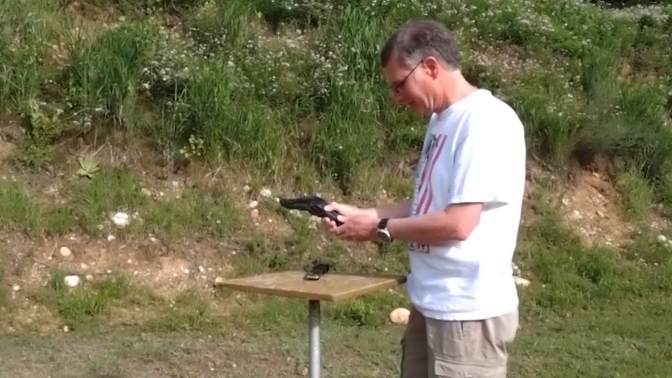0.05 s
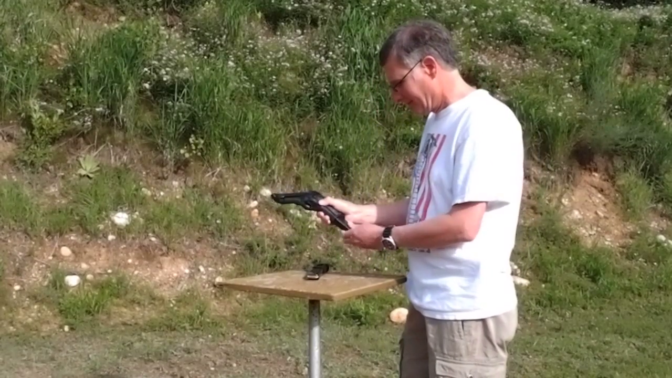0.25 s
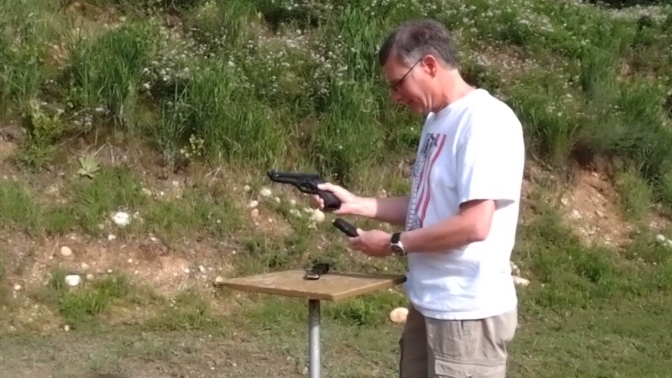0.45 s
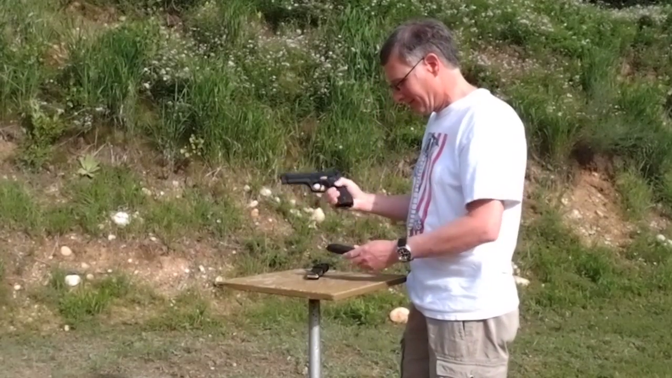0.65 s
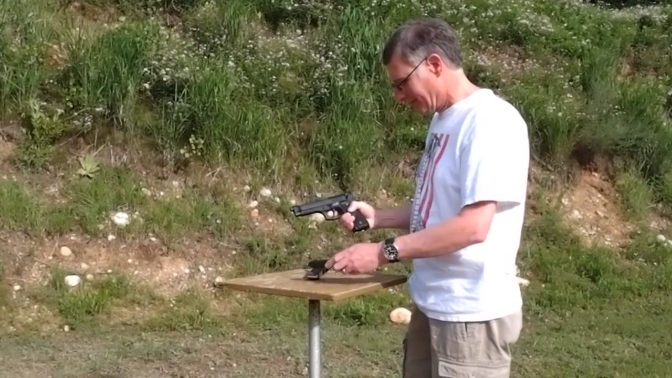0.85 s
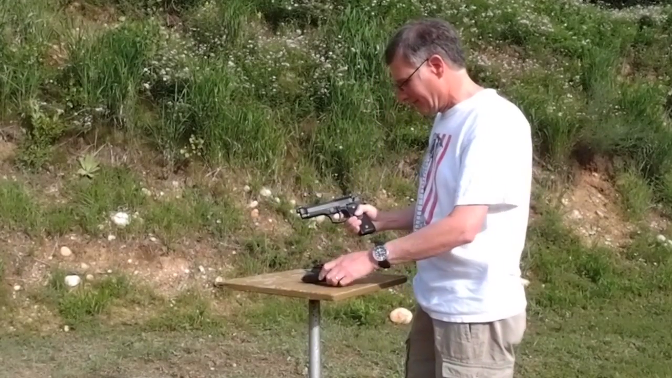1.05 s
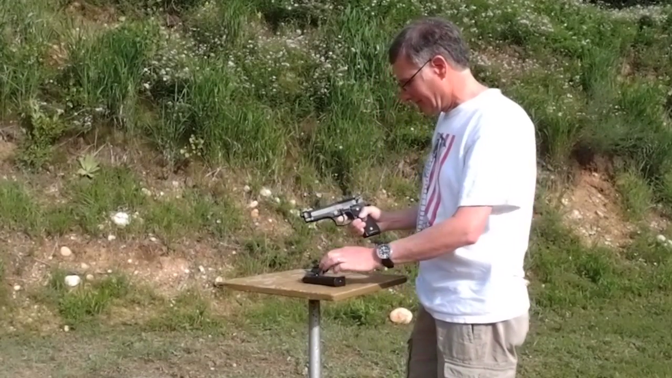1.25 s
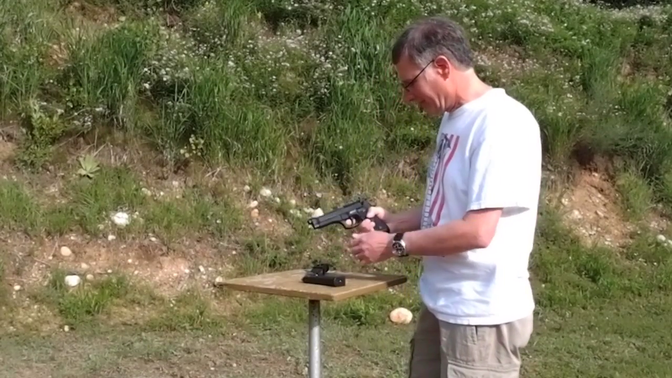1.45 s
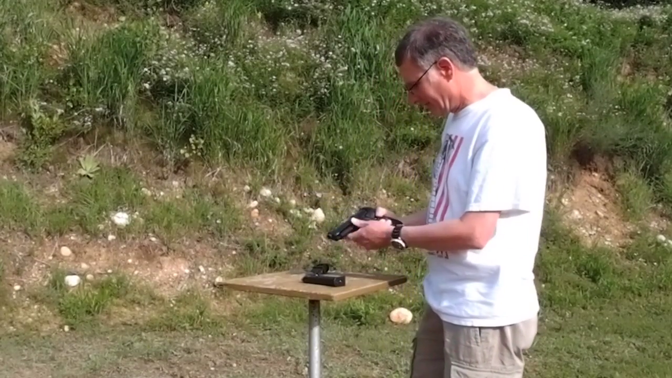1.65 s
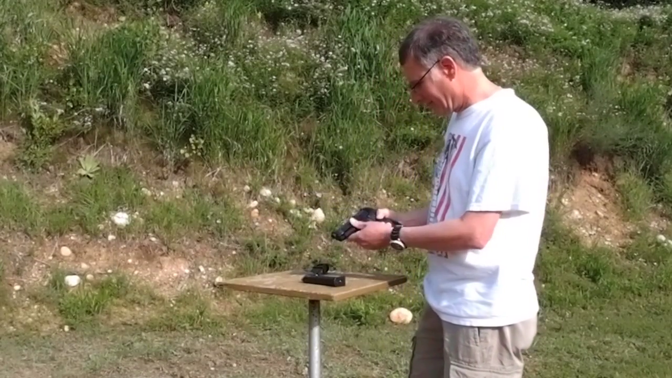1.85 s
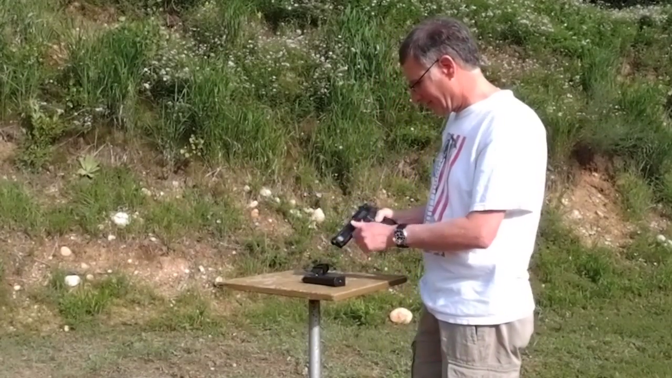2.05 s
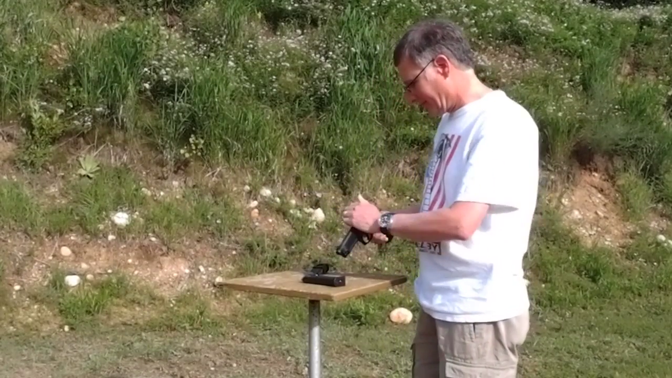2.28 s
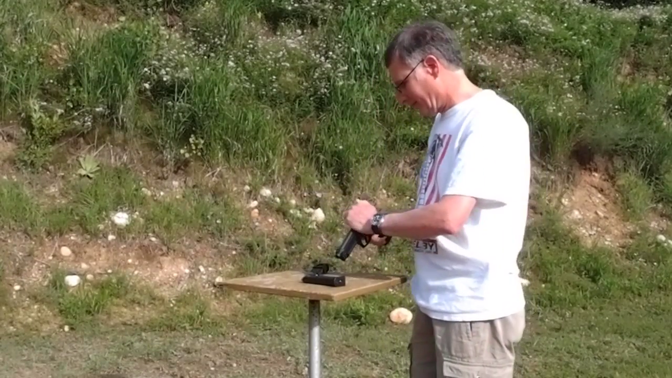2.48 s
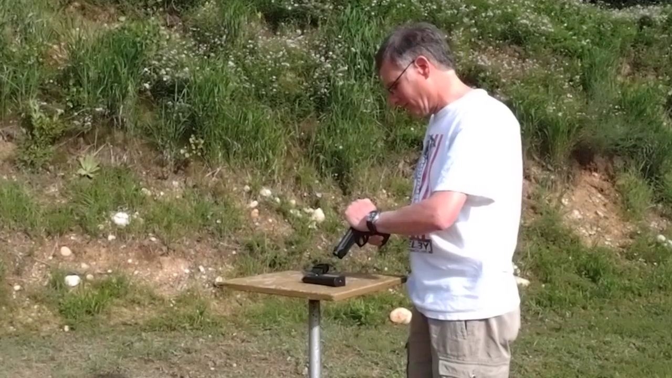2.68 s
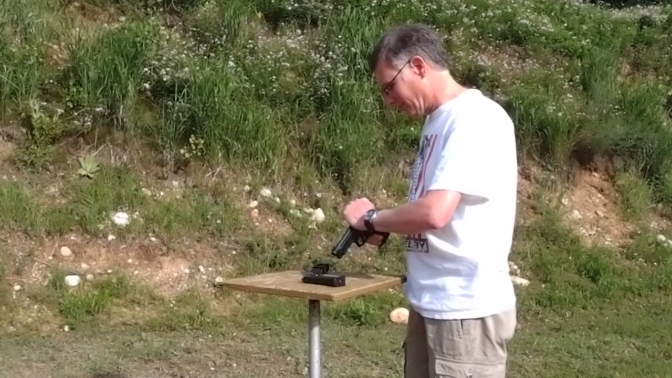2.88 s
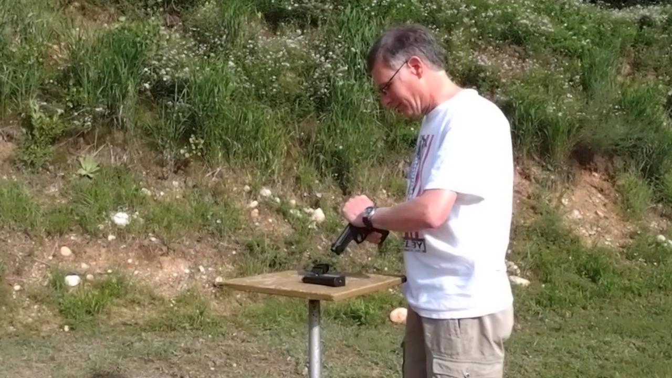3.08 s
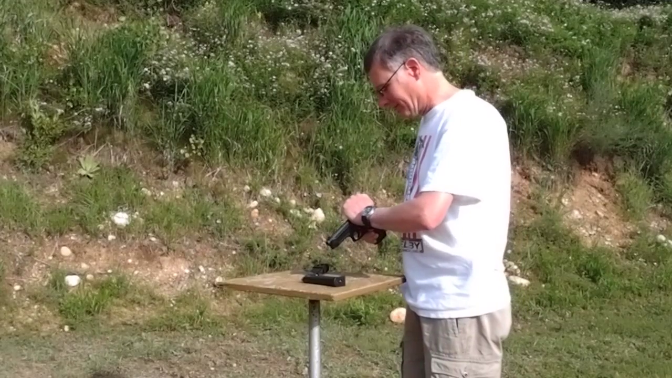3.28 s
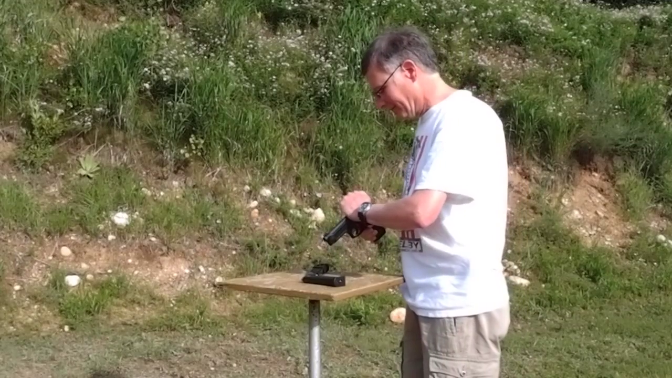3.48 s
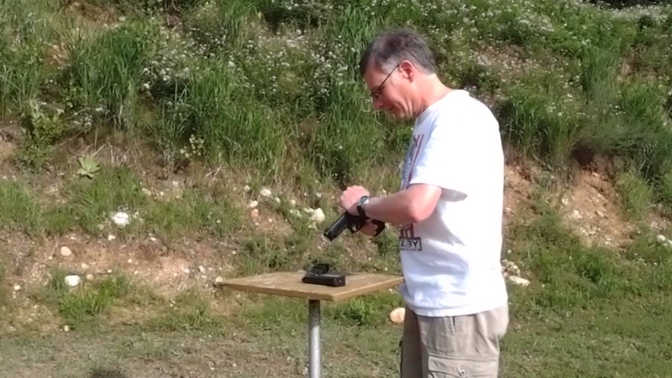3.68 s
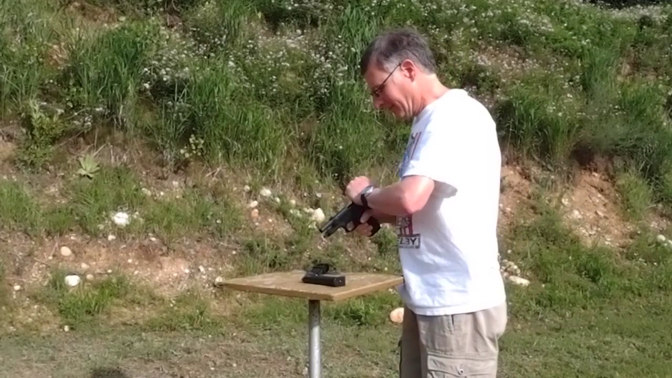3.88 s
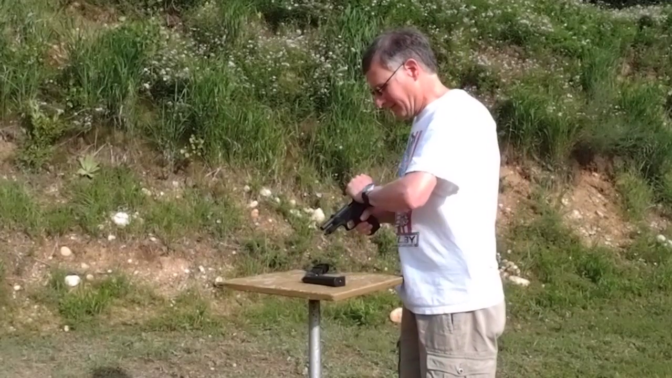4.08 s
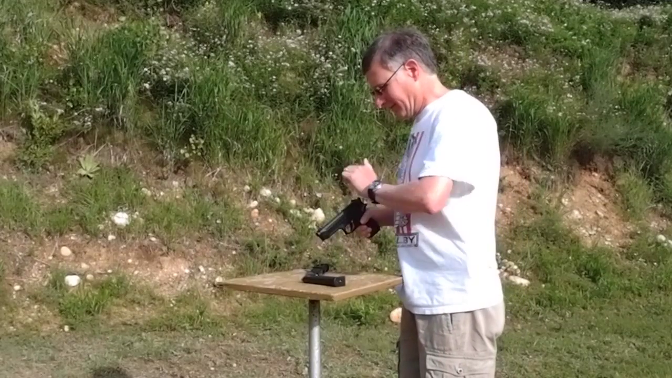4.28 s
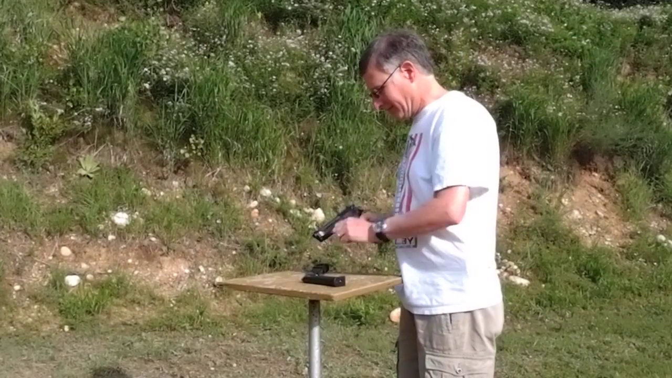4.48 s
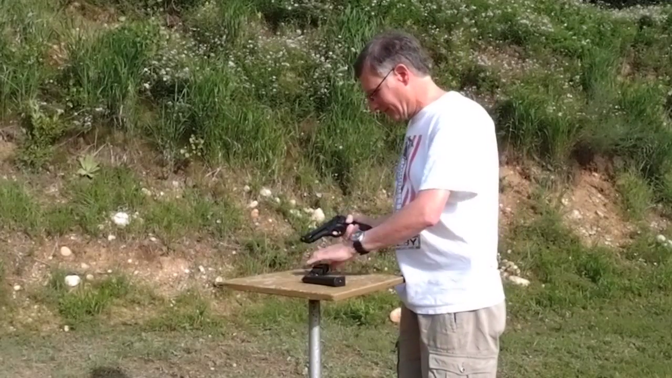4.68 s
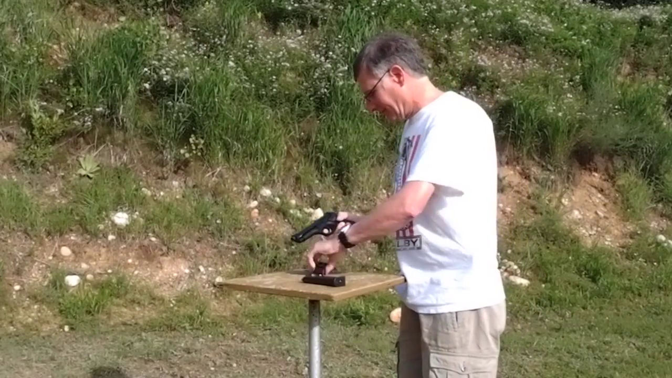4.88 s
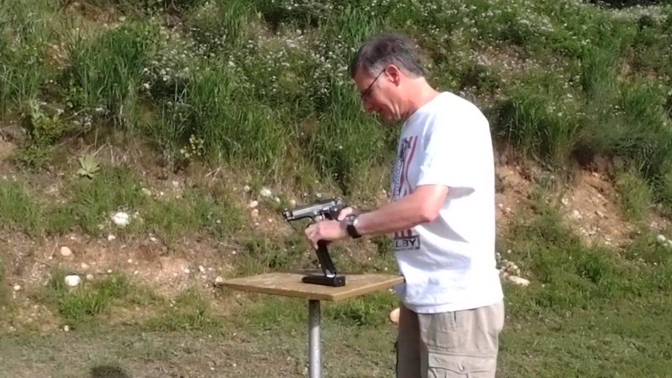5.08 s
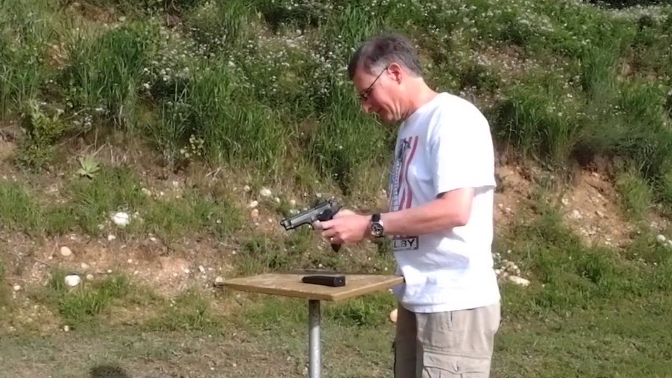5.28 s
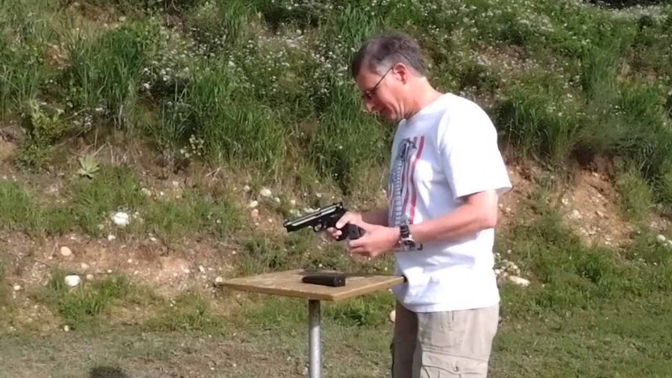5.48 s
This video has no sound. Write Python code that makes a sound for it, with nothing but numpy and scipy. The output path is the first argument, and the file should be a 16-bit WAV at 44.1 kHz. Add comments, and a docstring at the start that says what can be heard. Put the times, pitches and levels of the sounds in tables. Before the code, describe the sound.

Quiet outdoor air with low distant rumble and light hiss. At the very start two crisp steel clicks snap close together, with smaller ones around 0.15 and 0.4 s and a fine polished hiss near 0.3 s as the magazine slides out. A faint tick comes at 0.65 s. At 1.0 s the magazine knocks on a wooden table, then clatters in a tight cluster at 1.15 s, hollow and short. Dull hand and cloth rubbing follows at 1.7-2 s, with faint far hoots near 0.8 and 2 s. Thin high bird whistles and slurs, blurred by foliage, run from 2.8 to about 4.1 s. At 3.8 s the slide scrapes and clacks back, hard at 3.88; at 4.18 s it slams shut, by far the loudest, clipped, bright and ringing, with a short leafy echo tail. Soft touches at 4.95 and 5.05 s end it.

```python
"""A pistol at an outdoor range, before an overgrown bank: each contact is noise-like steel impacts plus ringing modes.
The magazine slips out with small clicks and a polished hiss, then knocks on a wooden table (struck modes).
Later the slide scrapes back on its rails and slams shut; skin and cloth rub on the grip (slip-modulated noise).
The bank scatters each sound into a bright noise tail, and the steel also returns as two smeared echoes.
Gliding near-sine notes make birdsong and faint far hoots; coloured noise makes the quiet outdoor air."""
import sys
import numpy as np
from scipy import signal
from scipy.fft import rfft, irfft, next_fast_len
from scipy.io import wavfile
from scipy.ndimage import uniform_filter1d, minimum_filter1d

SR = 44100
rng = np.random.default_rng(int(sys.argv[2]) if len(sys.argv) > 2 else 0)


def master(y):
    """Save y as 16-bit WAV."""
    cut = np.clip(np.atleast_2d(y).T, -1, 1)
    pcm = np.round(cut * 32767)  # scale
    wavfile.write(sys.argv[1], SR, pcm.astype(np.int16))


N = 244547
T = np.arange(N) / SR
CUTOFF_HZ = 15850

# Colour of slide and frame. Each row: frequency in Hz, relative spectral density in dB.
STEEL = [(100, -32.5), (300, -25.5), (750, -13), (1100, -15.5), (1900, -6), (2800, -1.5), (4300, -1.5),
         (6200, -3), (8000, 1), (9600, -7), (11500, -2), (14300, -4), (15800, -17.5)]
# What grass and leaves send back. Each row: frequency in Hz, relative level in dB.
BANK = [(200, -24), (1000, -9), (1800, -6), (2500, 0), (4500, -4), (7000, 2), (10000, -1), (15000, -1)]
# Bird syllables. Each row, one note: delay in seconds, length in seconds, start in Hz, end in Hz,
# level in dB re the syllable.
WHISTLE = [(0, 0.046, 6780, 6800, -1.5)]
SWOOP = [(0, 0.017, 6750, 5850, -5.5), (.019, .023, 5350, 4550, 0), (.041, .022, 3700, 4080, -2.5),
         (.057, 0.0153, 4200, 5150, -1.5), (.078, .06, 5650, 5580, -10)]
PIP_AND_SLUR = [(0, .028, 3730, 4020, -1.7), (.072, .036, 5300, 4380, -0.25)]
UPSLUR = [(0, 0.052, 3400, 4500, 0)]


def from_db(db):
    """Decibels to gain."""
    return 10 ** (np.asarray(db) / 20)


def rms_one(x):
    """Scale to unit rms."""
    return x / np.sqrt(np.mean(x ** 2) + 1e-20)


def add(out, start_s, sound):
    """Mix a sound in at a time."""
    at = max(round(start_s * SR), 0)
    out[at:at + len(sound)] += sound[:N - at]


def bins(size):
    """Transform bin frequencies in Hz, at least 1 Hz for the logarithms."""
    return np.maximum(np.arange(size // 2 + 1) * SR / size, 1)


def at_hz(points, hz):
    """Interpolate a spectrum in dB on a log-frequency axis."""
    knots_hz, db = np.transpose(points)
    return np.interp(np.log(hz), np.log(knots_hz), db)


def humps(modes, hz):
    """Resonances as bell-shaped lifts in dB."""
    return sum(db / (1 + (2 * (hz - centre_hz) / width_hz) ** 2) for centre_hz, width_hz, db in modes)


def colour(x, db_at):
    """Causal minimum-phase filter with the given dB shape, scaled to unit power gain."""
    size = 2 * next_fast_len(len(x))
    gain = rms_one(from_db(db_at(bins(size))))
    # fold the cepstrum onto positive time
    cepstrum = irfft(np.log(gain))
    cepstrum[1:size // 2] *= 2
    cepstrum[size // 2 + 1:] = 0
    response = np.exp(rfft(cepstrum))
    return irfft(rfft(x, size) * response)[:len(x)]


def fade(t, t60_s):
    """Exponential decay, a thousandth after t60."""
    return np.exp(-np.log(1000) * t / t60_s)


def ring(hz, t60_s):
    """One struck mode: a decaying sine."""
    t = T[:SR // 3]
    return np.sin(2 * np.pi * hz * t) * fade(t, t60_s)


def air(level_db=-56):
    """Steady distant rumble and microphone hiss: coloured noise."""
    # Background colour. Each row: frequency in Hz, relative spectral density in dB.
    air_spectrum = [(15, -32.5), (25, -12.5), (44, -7.5), (75, -1), (144, -2), (173, -4.5), (433, -6.5),
                    (469, -6.5), (522, -8), (2000, -15), (2620, -15), (5420, -18.5), (7100, -19),
                    (9540, -25), (15500, -21.5)]
    # Narrow humps and hollows on it. Each row: centre in Hz, width in Hz, lift in dB.
    hiss_shape = [(28.2, 19, -14), (51.1, 8.8, 14), (5280, 170, -9.5), (7800, 260, -6), (9370, 900, -6),
                  (11890, 1500, -13.5), (15070, 2000, -1.5)]
    noise = rng.standard_normal(N)
    sound = colour(noise, lambda hz: at_hz(air_spectrum, hz) + humps(hiss_shape, hz))
    return from_db(level_db) * rms_one(sound)


def clack(db, bright_db_oct, t60_s, part_hz):
    """A dying volley of tiny steel impacts rings the frame and the struck part."""
    # Slide and frame resonances. Each row: centre in Hz, width in Hz, lift in dB.
    steel_modes = [(1069, 120, 8.5), (1280, 68, 7), (1617, 90, 6.5), (2480, 750, 2), (2812, 120, -17.5),
                   (3620, 260, 2.5), (4300, 99, 4), (4980, 150, -0.5), (5830, 160, 5.5), (6250, 160, 5),
                   (7700, 140, 1), (9000, 160, -2), (10370, 300, -20), (13190, 550, -1), (14800, 509, 9.5)]
    part_width, part_db = 0.17, 12.5   # width as a fraction of part_hz
    linger_db, linger_t60_s = -14.0, 0.043
    t = T[:SR // 8]
    chatter = fade(t, t60_s) + from_db(linger_db) * fade(t, linger_t60_s)
    force = rng.choice([-1, 1], len(t)) * chatter
    modes = steel_modes + [(part_hz, part_width * part_hz, part_db)]

    def spectrum_db(hz):
        return at_hz(STEEL, hz) + humps(modes, hz) + bright_db_oct * np.log2(1 + hz / 1000)

    return from_db(db) * rms_one(colour(force, spectrum_db)) * np.std(force)


def after_ring(db, bright_db_oct, chatter_t60_s):
    """Frame, springs and pins ring on, more strongly after a harder or longer contact."""
    # Modes from the frame's low thud to springs and pins. Each row: frequency in Hz,
    # level in dB re the contact at the reference chatter (before brightness tilt), t60 in seconds.
    ringing = [(130.1, -40, .012), (340, -33, .018), (560, -29, .014), (4436, -23.5, .06),
               (8080, -29, 0.13), (8060, -26, .08), (11260, -18, 0.063), (11430, -17, 0.039),
               (11740, -36, .11)]
    reference_chatter_s = 0.021
    pivot_hz = 4960   # a bright contact favours modes above, a dull one those below
    modes = np.zeros(SR // 3)
    for hz, mode_db, t60_s in ringing:
        tilt_db = bright_db_oct * np.log2(1 + hz / pivot_hz) - bright_db_oct
        modes += from_db(mode_db + tilt_db) * ring(hz, t60_s)
    return from_db(db) * np.sqrt(chatter_t60_s / reference_chatter_s) * modes


def pistol():
    """Every steel contact clacks and leaves the same parts ringing."""
    # In turn: the magazine is released and slips out; the slide unlocks, cocks the hammer, hits its
    # rear stop and shifts in the hand; it is let go, slams shut and rattles; a last touch of the hand.
    # Each row: start in seconds, level in dB, brightness in dB per octave, chatter t60 in seconds,
    # ring of the struck part in Hz.
    contacts = [ (.0055, -30.5, -3, 0.068, 4770), (.013, -28.5, -5.5, 0.0078, 2600),
                (0.055, -32.5, -9, 0.026, 2450), (.078, -46, -8, .045, 2380),
                (.156, -31.5, -3, 0.0073, 2060), (.371, -47, -12, 0.043, 2900),
                (.389, -31, -7.5, 0.011, 2800), (.406, -42, -4.5, 0.012, 1200),
                (.642, -40.5, -8, 0.015, 2580), (1.059, -48.5, -9, .025, 6700),
                (3.7948, -34.5, 0, 0.056, 2500), (3.810, -26, 0, 0.041, 10500),
                (3.8194, -29.5, -4, 0.03, 4800), (3.8463, -15, -0.5, 0.0086, 3610),
                (3.868, -33.5, -4, 0.0091, 8540), (3.876, -6.5, -1, 0.0095, 2860),
                (3.922, -42.5, -5, .03, 1620), (4.024, -45, -11.5, 0.024, 1300),
                (4.06, -48.5, -7.5, .03, 1400), (4.1467, -40, -3.5, 0.021, 2250),
                (4.1677, -15.5, -5, 0.012, 3810), (4.1767, 5.5, -1, 0.0039, 4477),
                (4.185, -14, -2.5, 0.024, 1280), (4.1893, -6, 7, 0.015, 11250), (4.194, -20, 0, .014, 2300),
                (4.939, -46, -7, 0.028, 4460)]
    out = np.zeros(N)
    for start_s, db, bright_db_oct, t60_s, part_hz in contacts:
        add(out, start_s, clack(db, bright_db_oct, t60_s, part_hz))
        add(out, start_s, after_ring(db, bright_db_oct, t60_s))
    return out


def scatter(x, rise_s, t60_s, count):
    """Countless faint echoes from plants: each band's energy returns as noise that builds up and dies away."""
    size = next_fast_len(N + SR, True)
    t, hz = T[:SR], bins(size)
    arrivals = ((1 - np.exp(-(t / rise_s) ** 2)) * fade(t, t60_s)) ** 2
    spread = rfft(arrivals / arrivals.sum(), size)
    sound = rfft(x, size)
    noise = rfft(rng.standard_normal(size))
    out = np.zeros(N)
    edges_hz = np.linspace(np.sqrt(100), np.sqrt(CUTOFF_HZ), count + 1) ** 2
    for low, high in zip(edges_hz, edges_hz[1:]):
        centre = (low + high) / 2
        band = np.cos(np.pi / 2 * np.clip((hz - centre) / (high - low), -1, 1))
        energy = irfft(sound * band, size) ** 2
        power = irfft(rfft(energy) * spread, size)[:N]
        carrier = rms_one(irfft(noise * band, size)[:N])
        out += from_db(at_hz(BANK, centre)) * np.sqrt(np.abs(power)) * carrier
    return out


def far_echo(x, delay_s, smear_t60_s):
    """One return from a rough slope, smeared by a decaying burst of noise."""
    out, t = np.zeros(N), T[:SR // 8]
    smear = rng.standard_normal(len(t)) * fade(t, smear_t60_s)
    smear = smear / np.sqrt(np.sum(smear ** 2))
    add(out, delay_s, signal.fftconvolve(x, smear))
    return out


def strokes(rows, attack_s, release_t60_s):
    """Pressure of sliding strokes: each sets in, swells steadily to its end and dies away."""
    pressure = np.zeros(N)
    for start_s, length_s, db, swell_db in rows:
        onset = np.clip(1 + (T - start_s) / attack_s, 0, 1)
        to_go = np.clip(1 - (T - start_s) / length_s, 0, 1)
        release = fade(np.maximum(T - start_s - length_s, 0), release_t60_s)
        pressure += onset * from_db(db - swell_db * to_go) * release
    return pressure


def friction(pressure, spectrum, slips_per_s, slip_db, slip_t60_s=.009):
    """Rubbing: a hiss that surges briefly each time the surfaces slip."""
    slips = (rng.random(N) < slips_per_s / SR) * (1 + rng.random(N))
    slip_energy = signal.fftconvolve(slips, fade(T[:SR // 20], slip_t60_s) ** 2)[:N]
    surges = rms_one(np.sqrt(np.abs(slip_energy)))
    force = rng.standard_normal(N) * (1 + from_db(slip_db) * surges)
    return pressure * rms_one(colour(force, lambda hz: at_hz(spectrum, hz)))


def polished_glide():
    """Fine hiss of polished steel, as the magazine slips out and as fingers take hold of the slide."""
    # Each row: start in seconds, length in seconds, final level in dB, swell over the stroke in dB.
    glide_rows = [(.255, 0.11, -54.5, 10.5), (3.38, 0.17, -65, 1)]
    # Each row: frequency in Hz, relative spectral density in dB.
    glide_colour = [(2000, -5), (5000, -11), (7500, -4), (11000, -9), (15000, -7)]
    pressure = strokes(glide_rows, attack_s=.03, release_t60_s=0.055)
    return friction(pressure, glide_colour, slips_per_s=250, slip_db=0.0)


def glides(notes, waver_hz):
    """Near-sine notes that swell and fade, slide in pitch and waver a little."""
    out = np.zeros(N)
    for start_s, length_s, start_hz, end_hz, db in notes:
        u = np.linspace(0, 1, int(length_s * SR))
        waver = rms_one(uniform_filter1d(rng.standard_normal(SR // 2), size=150))[:len(u)]
        pitch_hz = start_hz + (end_hz - start_hz) * u + waver_hz * waver
        tone = np.sin(2 * np.pi * np.cumsum(pitch_hz) / SR)
        add(out, start_s, from_db(db) * np.sin(np.pi * u) * tone)
    return out


def hoots():
    """Faint low hoots from far away: wavering near-sines."""
    # Each row: start in seconds, length in seconds, start in Hz, end in Hz, level in dB.
    hoot_notes = [(.81, 0.074, 706, 724, -60), (2.02, 0.26, 800, 793, -58.5)]
    return glides(hoot_notes, waver_hz=49.0)


def thud():
    """Dense modes of the board, too close and short-lived to be heard one by one: decaying dull noise."""
    level_db, t60_s, upper_hz = -6.5, 0.042, 1350   # level re the knock
    t = T[:SR // 3]
    lowpass = signal.butter(2, upper_hz, fs=SR, output="sos")
    dull = signal.sosfilt(lowpass, rng.standard_normal(len(t)))
    return from_db(level_db) * rms_one(dull) * fade(t, t60_s)


def table():
    """The magazine clicks and knocks on the board; a softer contact leaves the upper modes quiet."""
    # Each row: start in seconds, level in dB, contact softness in ms, level of the steel click in dB,
    # time until the hand damps the board in seconds.
    knocks = [(.9822, -22, 0.54, -32, 0.037), (1.1355, -21.5, 1.1, -32, 0.074),
              (1.1575, -27.5, 0.1, -25, 0.043), (1.1605, -19.5, .32, -25.5, 0.024),
              (1.171, -27, 0.099, -43, 0.03), (5.04, -42, 1.4, -69, .036)]
    # Table-top modes. Each row: frequency in Hz, level in dB re the knock, undamped t60 in seconds.
    wood = [(129, -12.5, 0.14), (156, -8, 0.047), (266, -4, 0.023), (316, -18, 0.25), (466, 0, 0.37),
            (580, 0, 0.019), (650, -10, 0.056), (804, -4, 0.096), (930, -2.5, 0.12), (1038, -11, 0.06),
            (1246, -3, 0.019), (1390, -10.5, 0.11), (2030, -26, 0.045)]
    click_bright_db_oct, click_t60_s, click_hz = -4, 0.0094, 4670
    board_lag_s = 0.001215   # the board answers just after the click
    thud_hz = 1350 / 2   # where softness is read for the thud
    out = np.zeros(N)
    for start_s, db, soft_ms, click_db, damping_s in knocks:
        def passed(hz):
            return 1 / (1 + (2 * hz * soft_ms / 1000) ** 2)

        knock = passed(thud_hz) * thud()
        for k, (hz, mode_db, t60_s) in enumerate(wood):
            knock = knock + (-1) ** k * from_db(mode_db) * passed(hz) * ring(hz, t60_s)
        add(out, start_s, clack(click_db, click_bright_db_oct, click_t60_s, click_hz))
        # the hand bears down and damps the board more and more
        damping = np.exp(-(T[:len(knock)] / damping_s) ** 2)
        add(out, start_s + board_lag_s, from_db(db) * knock * damping)
    # a small open board radiates no deep bass
    highpass = signal.butter(4, 113.0, "high", fs=SR, output="sos")
    return signal.sosfilt(highpass, out + 1e-18)


def grip_rub():
    """Skin and cloth rubbing on the grip: dull hiss with sparse slips."""
    # Each row: start in seconds, length in seconds, final level in dB, swell over the stroke in dB.
    rub_rows = [(1.715, 0.06, -49.5, 9), (1.85, 0.073, -48, 6.5), (3.35, 0.15, -62, 0)]
    # Each row: frequency in Hz, relative spectral density in dB.
    rub_colour = [(120, -40), (200, -11), (233, -10), (521, -3), (1290, -8.5), (1870, -8), (3070, -20.5),
                  (3590, -15.5), (8000, -33.5), (10400, -58), (17600, -120)]
    pressure = strokes(rub_rows, attack_s=.025, release_t60_s=0.48)
    return friction(pressure, rub_colour, slips_per_s=120, slip_db=-1.0)


def bird(wet_db=5.0):
    """Thin whistled syllables, repeated and mostly heard through the foliage."""
    # Each row: start in seconds, syllable, level in dB.
    song_rows = [(2.76, WHISTLE, -74), (2.885, WHISTLE, -71), (2.912, SWOOP, -57.5), (3.06, WHISTLE, -63),
                 (3.108, SWOOP, -56), (3.289, PIP_AND_SLUR, -51), (3.484, PIP_AND_SLUR, -51.5),
                 (3.67, WHISTLE, -60.5), (3.765, UPSLUR, -53.5), (4.078, UPSLUR, -61)]
    notes = []
    for start_s, syllable, db in song_rows:
        for delay_s, length_s, start_hz, end_hz, note_db in syllable:
            notes.append((start_s + delay_s, length_s, start_hz, end_hz, db + note_db))
    song = glides(notes, waver_hz=55.0)
    return song + from_db(wet_db) * scatter(song, rise_s=0.027, t60_s=.7, count=32)


def rails():
    """The slide scrapes along its rails, drawn back by hand, then sped forward by its spring."""
    # Each row: start in seconds, length in seconds, final level in dB, swell over the stroke in dB.
    rail_rows = [(3.8, .065, -44.5, 11.5), (4.148, 0.022, -37.5, 22)]
    pressure = strokes(rail_rows, attack_s=0.011, release_t60_s=.15)
    return friction(pressure, STEEL, slips_per_s=1300, slip_db=1.0)


def scene():
    """Everything in the hands is near and echoes off the bank; birds and air lie behind."""
    steel = pistol() + rails()
    near = steel + table() + grip_rub() + polished_glide()
    tail = from_db(-23.5) * scatter(near, rise_s=0.024, t60_s=0.51, count=28)
    # steel also bounces off the bare face of the bank and off the far edge of the range
    thrown = colour(steel, lambda hz: at_hz(BANK, hz))
    bank_echo = from_db(-27.5) * far_echo(thrown, delay_s=0.042, smear_t60_s=0.1)
    edge_echo = from_db(-46.5) * far_echo(thrown, delay_s=.22, smear_t60_s=.08)
    behind = bird() + hoots() + air()
    return (near + tail + bank_echo + edge_echo + behind)[None]


def record(dry, limit=2.3, ceiling=1.0):
    """A fast limiter ducks the hardest clacks, peaks above the ceiling are clipped, the top is cut."""
    gain = limit / np.maximum(np.abs(dry), limit)
    gain = uniform_filter1d(minimum_filter1d(gain, size=31), size=31)
    clipped = np.clip(gain * dry, -ceiling, ceiling)
    lowpass = signal.ellip(10, .1, 80, CUTOFF_HZ, fs=SR, output="sos")
    return signal.sosfilt(lowpass, clipped)


dry = scene()
out = record(dry)
master(out)
```